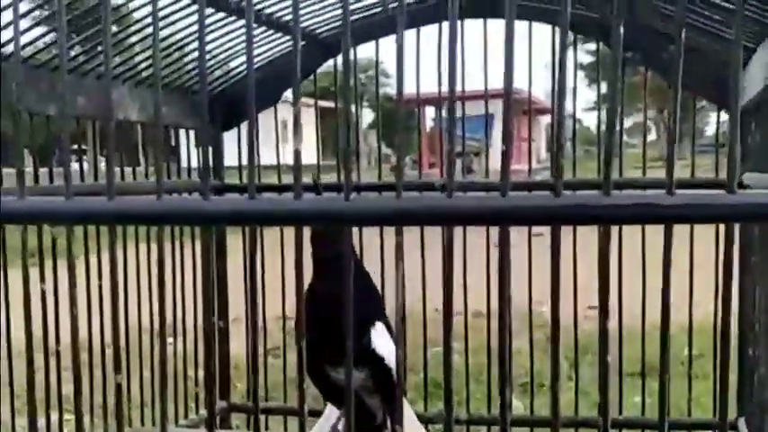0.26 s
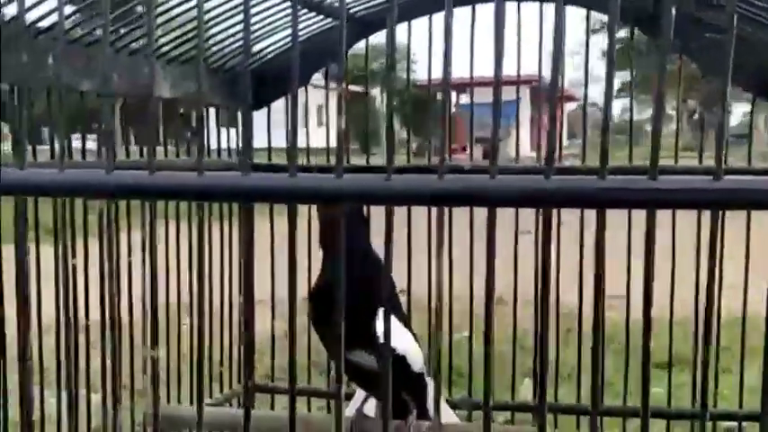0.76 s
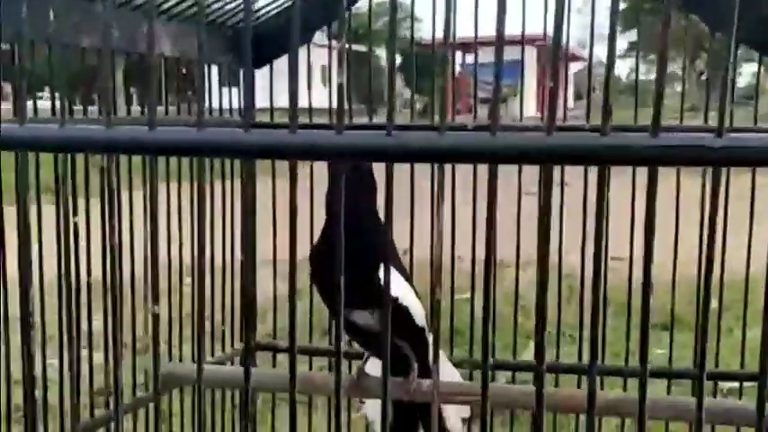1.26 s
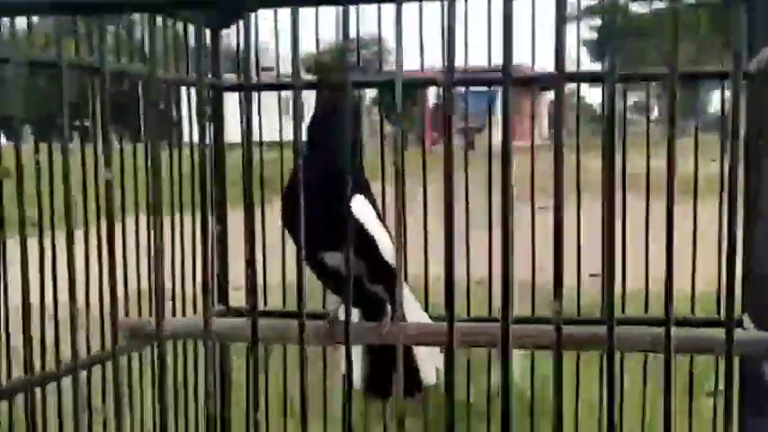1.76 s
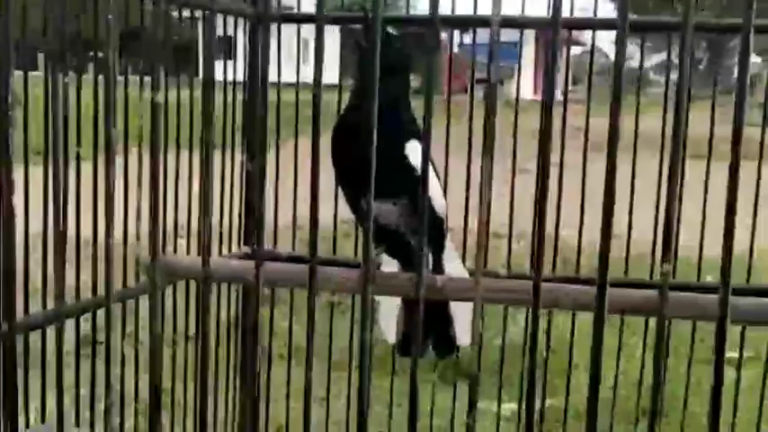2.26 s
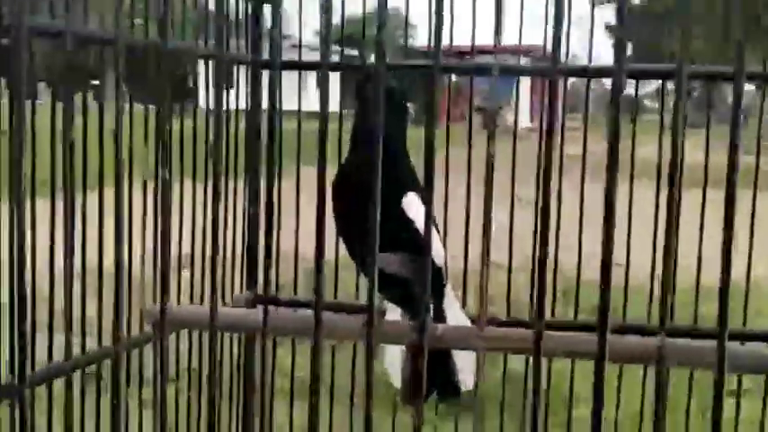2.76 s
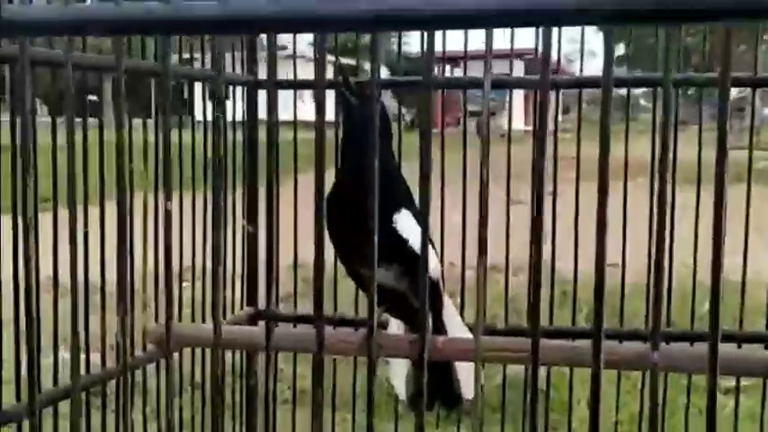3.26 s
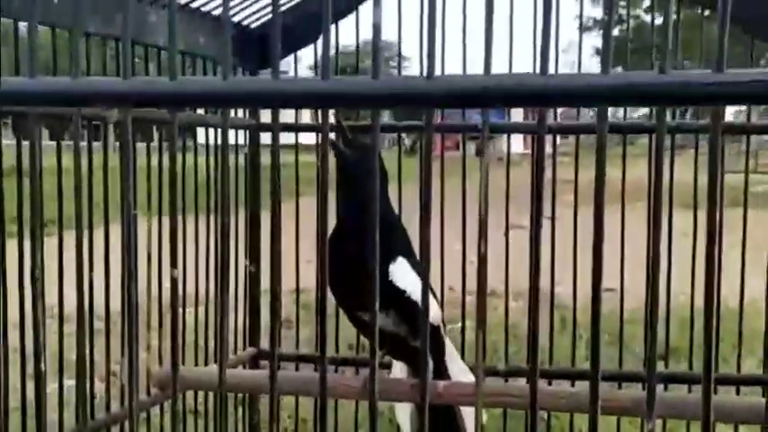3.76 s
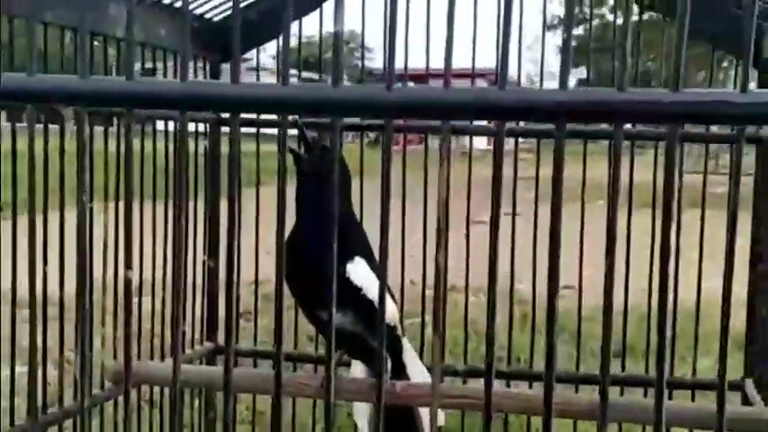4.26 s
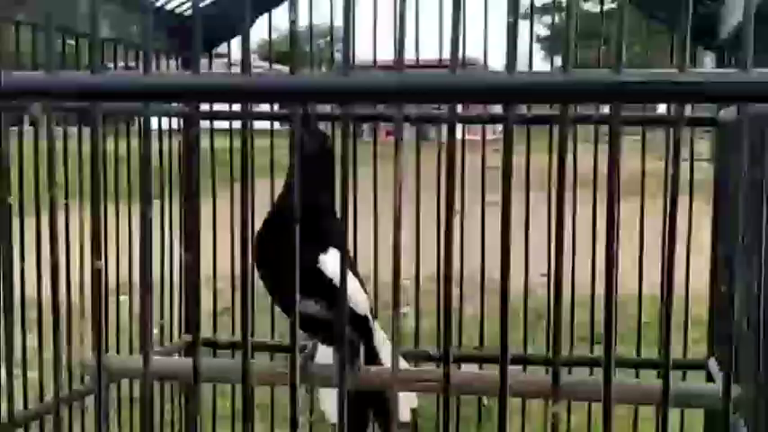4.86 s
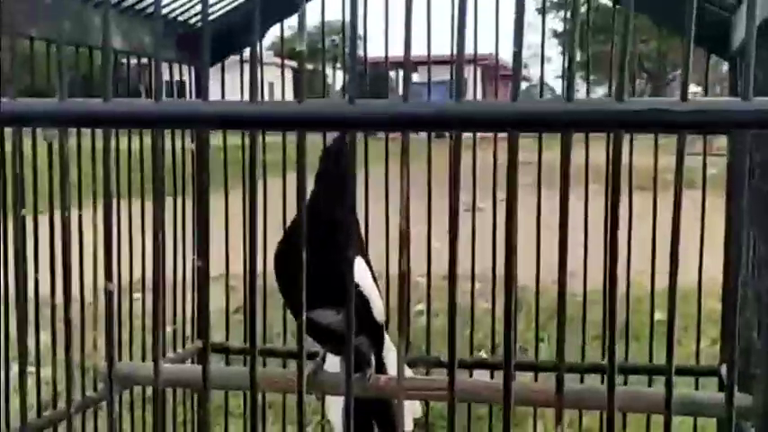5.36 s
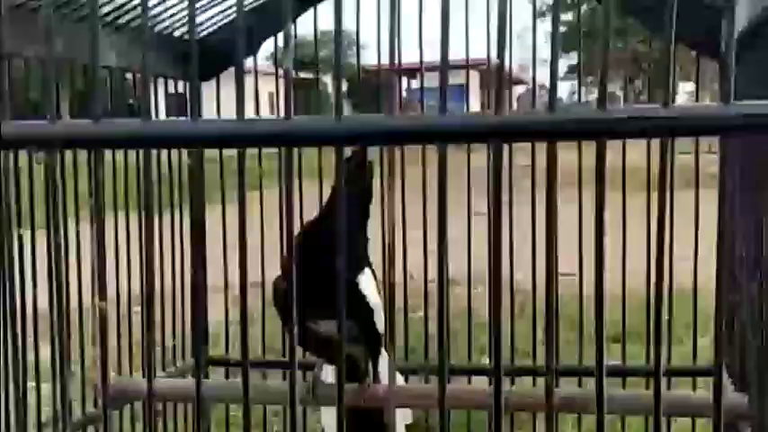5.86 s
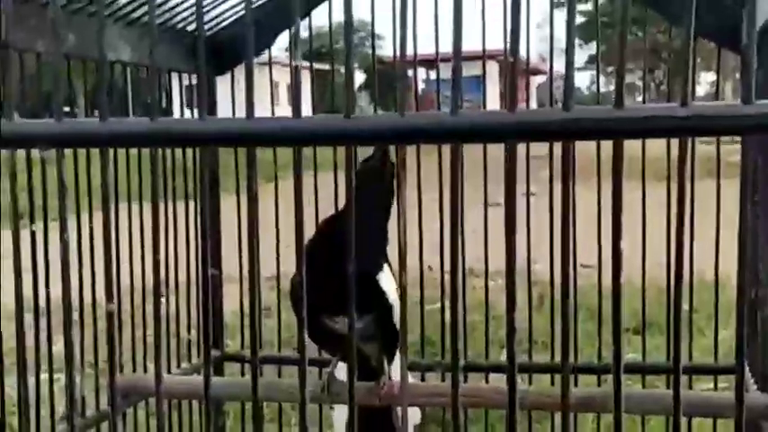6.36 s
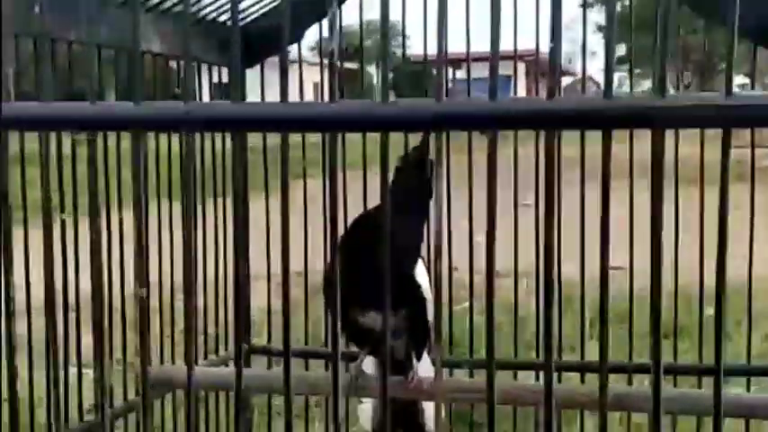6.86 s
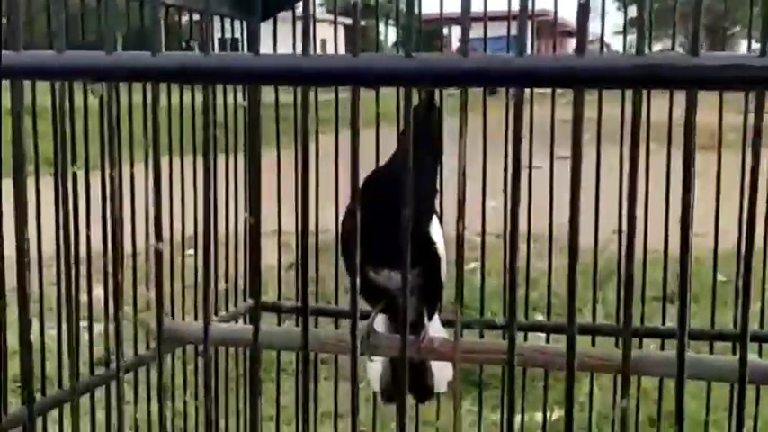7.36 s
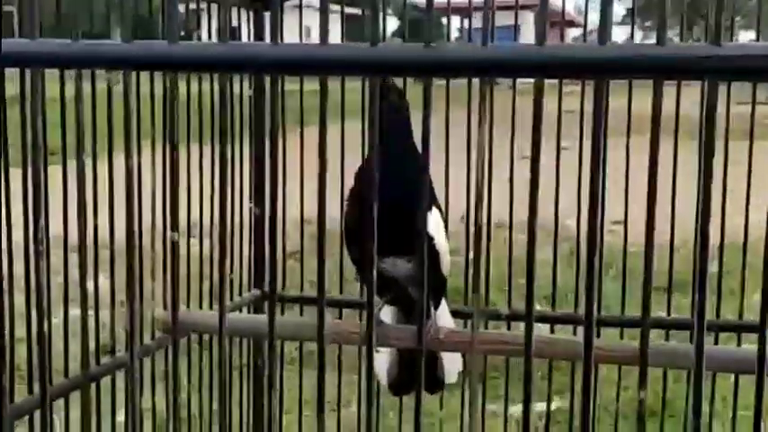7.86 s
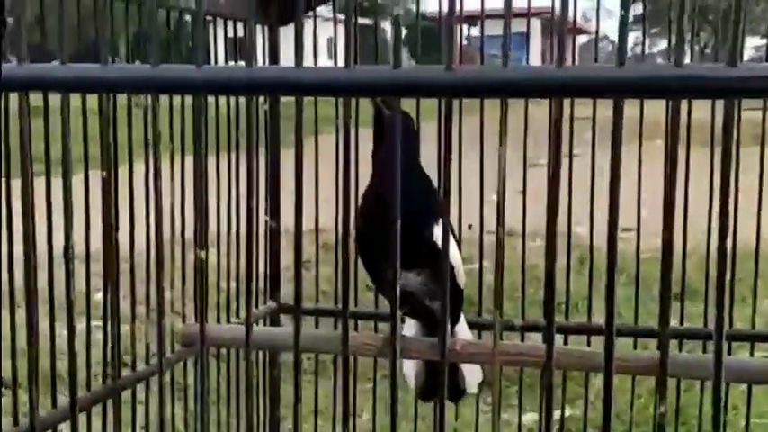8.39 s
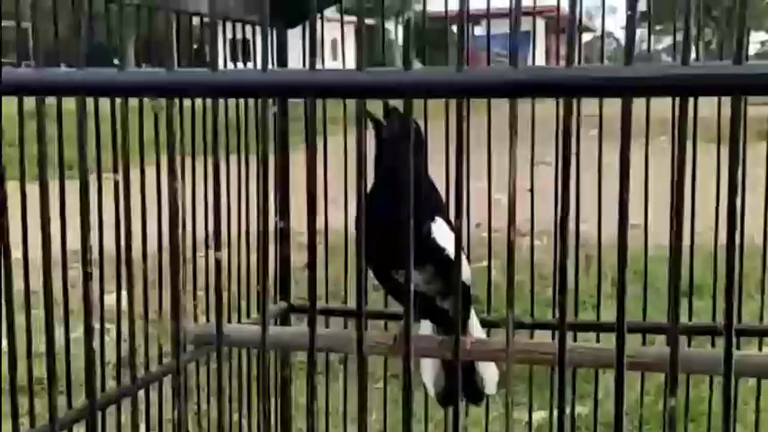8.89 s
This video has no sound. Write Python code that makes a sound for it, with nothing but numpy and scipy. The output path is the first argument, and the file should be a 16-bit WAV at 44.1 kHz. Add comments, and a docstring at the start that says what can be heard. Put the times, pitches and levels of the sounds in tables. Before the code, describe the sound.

A caged songbird sings close to the microphone outdoors. It opens with slurred whistles and a quick run of chirps, then a long arching whistle and a dry rattle. Harsh, nasal and buzzy notes follow, then a run of rasps, before the arching phrase returns. A few sharp clicks fall between notes, while faint far birds and a low rumble lie beneath.

```python
"""A caged songbird outdoors

Close by, a bird's syrinx, filtered by its throat, gives whistles, warbled trills, harsh notes,
a rattle and rasps; sharp clicks fall between the notes. Far birds and a low background rumble
lie beneath, and reflections from walls and ground add a thin tail.
A limiter lowers the gain after the loudest peaks."""
import sys
import numpy as np
from scipy import signal
from scipy.fft import rfft, irfft
from scipy.io import wavfile
from scipy.ndimage import uniform_filter1d, minimum_filter1d

SR = 44100
rng = np.random.default_rng(int(sys.argv[2]) if len(sys.argv) > 2 else 0)


def digitize_waveform(pressure):
    """Quantize a signal to 16-bit integers and store it at the path in sys.argv[1].

    Rows of a 2-D input are taken as channels; values are limited to [-1, 1].
    """
    field = np.atleast_2d(pressure).T
    bounded = np.clip(field, -1, 1)
    quanta = np.round(bounded * 32767).astype(np.int16)
    wavfile.write(sys.argv[1], SR, quanta)


N = 402629

# Level of the low background rumble, including its ducking under the long whistles: time_s, level_db
RUMBLE_LEVEL = [(0, -38.5), (1.5, -38), (2.6, -34), (4.0, -36), (4.8, -37), (5.1, -28), (6.6, -33.5),
                (7.6, -32), (9.13, -29)]
# Spectra of the rumble and the far twitter: frequency_hz, relative_db
RUMBLE_SPECTRUM = [(20, -48), (30, -11.5), (81, 2), (148, -0.5), (250, -10.5), (389, -18.5), (575, -41.5),
                   (1400, -51.5), (2500, -77)]
TWITTER_SPECTRUM = [(1300, -33.5), (1800, -3.5), (3200, -22.5), (4200, -12), (5600, -18.5)]
# Far whistles and coos: start_s, end_s, first_hz, last_hz, level_db
FAR_CALLS = [(.735, 0.78, 5200, 5400, -53), (.85, 0.898, 4850, 5200, -49), (.96, 1.006, 4880, 5100, -48),
             (1.07, 1.136, 4300, 5030, -55.5), (3.04, 3.17, 5050, 5070, -64.5),
             (4.8, 5.122, 1750, 1884, -51), (5.569, 5.775, 782, 740, -50), (6.101, 6.515, 750, 870, -54),
             (6.97, 7.15, 1830, 1963, -51), (7.197, 7.43, 750, 815, -54), (7.85, 8.152, 768, 906, -46)]
# Weighting of the harmonics, throat resonance plus the microphone's treble lift: frequency_hz, gain_db
HARMONIC_WEIGHTS = [(1200, 24.5), (2000, 7), (3500, 12.5), (4300, -1), (5300, -3), (6300, -32.5),
                    (9000, -28), (13000, -27), (16000, -23.5)]
# Contours of repeated syllables, by kind: offset_s, pitch_hz, level_db
SYLLABLES = { "slur": [(0, 3150, -40), (.012, 3222, -18.5), (.03, 3198, -9.5), (.065, 3027, -14),
             (.13, 2834, -16.5), (.147, 2800, -32)], "chip": [(0, 3250, -33), (.005, 3165, -11.5),
             (.014, 3073, -12), (.033, 2891, -15.5), (.047, 3020, -14.5), (.056, 2964, -31.5)],
             "hook": [(0, 1644, -33.5), (.014, 1681, -20), (.033, 1959, -21.5), (.042, 2082, -13.5),
             (.056, 2155, -11), (.064, 2080, -17.5), (.072, 1976, -40.5)], "lead": [(0, 1655, -39),
             (.01, 1680, -22), (.03, 2080, -21.5), (.052, 2220, -16)], "arch": [(0, 2197, -23.5),
             (.022, 2920, -12.5), (.035, 3150, -8.5), (.07, 3390, -13.5), (.16, 3555, -13.5),
             (.255, 3604, -15), (.28, 3350, -17), (.292, 2970, -18), (.33, 2200, -16), (.35, 2020, -16.5),
             (.378, 1763, -32.5)], "rise": [(0, 2030, -55.5), (.012, 2060, -26.5), (.03, 2287, -21),
             (.042, 2487, -10), (.057, 2560, -13), (.064, 2533, -29.5)], "pipe": [(0, 2710, -13.5),
             (.008, 3278, -19.5), (.027, 3074, -8.5), (.083, 2990, -15.5), (.1, 2990, -38)],
             "peak": [(0, 2280, -39.5), (.009, 2900, -25.5), (.014, 3350, -14.5), (.019, 3450, -9),
             (.035, 3250, -14.5), (.059, 3046, -30)], "flick": [(0, 2680, -37), (.026, 2165, -31),
             (.05, 2770, -18), (.069, 2605, -18.5), (.084, 2670, -53)], "chatter": [(0, 1326, -31.5),
             (.006, 1900, -14.5), (.01, 2001, -9.5), (.015, 1915, -14.5), (.022, 1400, -19),
             (.034, 1140, -24.5)], }
# Each use of a syllable, by kind: start_s, time_factor, pitch_factor, gain_db
REPEATS = { "slur": [(.2, 1.056, 0.9955, -0.2), (.41, .93, 1.03, 0.7)], "chip": [(.613, 0.71, 1.005, 0.7),
           (.695, 0.86, 1, -0.5), (.786, 0.97, .99, -1.4), (.9, 1.02, 1.003, -1.2),
           (1.008, .93, 1.005, -1.5), (1.124, 1.12, 1.004, -2)], "hook": [(1.874, 1.2, .99, 0.5),
           (2.01, 0.97, 1.008, 0), (7.806, 1.26, 0.997, 2.8), (7.945, .97, 0.98, 0)],
           "lead": [(2.123, .99, .995, -3), (8.059, 1.02, 0.99, 1)], "arch": [(2.17, 0.992, 1.0115, 0.14),
           (8.108, 1.022, 1, 0.9)], "rise": [(2.806, 1.001, 1.003, 1), (8.645, 0.96, 1.012, 2.5)],
           "pipe": [(2.848, 1.05, .993, 0), (8.69, 0.92, 1.011, 3)], "peak": [(3.3, 0.97, 0.998, -0.7),
           (9.021, 1.05, 1.004, 3.7)], "flick": [(3.336, 1.005, 1.035, -1.8), (9.06, 0.89, 1.015, 0)],
           "chatter": [(5.114, 0.9, 1.02, -0.5), (5.144, 1.32, 1.05, -0.76), (5.173, 1.15, .96, -1)], }
# Contours of notes sung once, by kind: time_s, pitch_hz, level_db
SINGLE_NOTES = { "fall": [[(0.0, 2720, -54.5), (.012, 2690, -28), (0.047, 2534, -21.5),
                (0.072, 2410, -11.5), (.095, 2200, -27), (0.11, 2050, -12.5), (.128, 1927, -22.5),
                (.14, 1820, -17.5), (0.152, 1840, -32)]], "clear": [[(1.217, 3480, -29), (1.225, 3096, -11),
                (1.25, 3034, -12.5), (1.278, 3006, -40), (1.298, 3126, -13), (1.308, 3044, -11.5),
                (1.359, 3048, -16.5), (1.389, 3034, -38.5)], [(3.982, 2999, -65), (4.019, 3323, -19),
                (4.056, 3400, -14), (4.122, 3253, -15.5), (4.152, 3144, -18), (4.178, 2990, -58.5)],
                [(4.418, 3020, -33.5), (4.442, 3080, -12.5), (4.522, 2860, -19.5), (4.542, 2930, -29.5)],
                [(4.622, 2750, -38), (4.659, 2765, -18.5), (4.696, 2755, -13.5), (4.704, 2680, -44)],
                [(4.692, 3030, -15), (4.698, 3190, -4.5), (4.73, 3171, -11.5), (4.832, 3335, -13),
                (4.892, 3393, -13), (4.91, 3310, -44.5)]], "drone": [[(3.96, 1740, -28.5),
                (4.026, 1918, -27), (4.068, 1874, -29.5), (4.074, 1860, -51)], [(4.315, 1705, -31.5),
                (4.344, 1786, -22), (4.426, 1769, -17.5), (4.434, 1720, -20.5), (4.439, 1750, -27)],
                [(5.79, 1886, -36), (5.803, 1806, -22), (5.852, 1695, -19.5), (5.886, 1771, -17.5),
                (5.91, 1610, -31)]], "breathy": [[(5.002, 3050, -35), (5.008, 3470, -18.5),
                (5.022, 3740, -17.5), (5.036, 4020, -8), (5.046, 4220, -11), (5.051, 3930, -16),
                (5.062, 3140, -29.5)], [(5.775, 3540, -41), (5.807, 3870, -8), (5.812, 3920, -8),
                (5.826, 4020, -43)], [(6.508, 5010, -30.5), (6.517, 4140, -9.5), (6.523, 3030, -21),
                (6.534, 1800, -24.5), (6.545, 1630, -31.5), (6.558, 2160, -24), (6.564, 2410, -12.5),
                (6.578, 2483, -15.5), (6.596, 2230, -25.5)], [(6.63, 1744, -55.5), (6.644, 2920, -23.5),
                (6.66, 3090, -10), (6.675, 3210, -12.5), (6.684, 3240, -51)], [(6.668, 4000, -30),
                (6.676, 3985, -19), (6.7, 3740, -12), (6.717, 3530, -25), (6.728, 3350, -15),
                (6.74, 3180, -39)]], "harsh": [[(5.362, 1680, -35), (5.386, 1714, -11), (5.43, 1576, -8),
                (5.439, 1541, -12.5), (5.482, 1137, -31.5)]], "nasal": [[(6.058, 1636, -57.5),
                (6.08, 1711, -14.5), (6.112, 1679, -7), (6.163, 1704, -10), (6.189, 1624, -10),
                (6.216, 1340, -54)]], "buzz": [[(5.82, 4130, -10.5), (5.87, 4205, -17.5),
                (5.891, 3955, -18.5), (5.908, 3607, -39.5)]], }
# Base timbre, by kind: overtone_gain_db, breath_db
TIMBRES = {"slur": (-12, -49), "chip": (-7.5, -33.5), "hook": (-19, -35.5), "lead": (-6.5, -30),
           "arch": (-6.5, -48), "rise": (-18, -32), "pipe": (-10, -40), "peak": (-10, -27),
           "flick": (-5.5, -39), "chatter": (11, -22), "clear": (-11.5, -46), "drone": (-1.2, -38),
           "breathy": (-19, -30), "harsh": (14, -30), "nasal": (14.7, -36.5), "fall": (-19.5, -45.5),
           "buzz": (-8, -10)}
# Modulation, by kind: rate_hz, first_depth, last_depth, pitch_share_per_depth
WARBLES = {"slur": (67.2, 0.44, 0.056, .08), "chip": (108, 0.76, -0.18, .07),
           "harsh": (218, .04, 0.36, .02), "nasal": (228, 0.16, 0.085, 0.035),
           "buzz": (83, 0.062, 0.14, .54)}
# Hard taps and scratchy ticks: start_s, relative_db
CLICKS = [(2.3485, -35.5), (2.7881, -6), (8.2197, -6.5), (8.5935, -3)]
TICKS = [(5.024, -18.5), (5.2888, -15.5), (5.5643, -22), (5.7124, -24), (5.9955, -22), (7.3875, -25)]
# Modes rung by a tap: frequency_hz, relative_db, t60_s
CLICK_MODES = [(2343, 3, 0.016), (2490, -13.5, 0.015), (4860, -29, 0.019)]
# Rattle beats, evenly spaced between rows: time_s, beat_number
RATTLE_BEATS = [(3.42, 0), (3.508, 3), (3.575, 5), (4.344, 29), (4.372, 30), (4.548, 37)]
# Strength of the rattle: time_s, chirp_gain_db, pop_gain_db
RATTLE_SWELL = [(3.42, -31, -48), (3.49, -24, -16), (3.56, -34, -26.5), (3.9, -35.5, -33),
                (4.06, -34.5, -32.5), (4.13, -50, -45.5), (4.23, -35.5, -27.5), (4.42, -37.5, -33.5),
                (4.56, -42, -41)]
# Hiss of the rattle and the ticks: frequency_hz, relative_db
HISS_SPECTRUM = [(900, -39.5), (1200, -32.5), (1800, -6), (3100, -8), (5000, -23), (9900, -25.5),
                 (15500, -35)]
# Rasped bursts: peak_s, gain_db
RASP_BURSTS = [(5.128, -31), (5.186, -26.5), (7.329, -36), (7.442, -26.5), (7.553, -25.5), (7.677, -27),
               (7.796, -28.5), (7.916, -27.5), (8.037, -33)]
# Throat modes in a rasp: frequency_hz, width_hz, relative_db
RASP_MODES = [(2030, 60, 8.5), (2935, 260, 15.5), (4134, 110, 14), (4530, 170, -21.5), (3650, 1200, 5.5),
              (10800, 2900, -3.5)]

OVERTONE_TILT_DB, OVERTONE_FLUTTER_DB = -1, 3   # per harmonic; spread above the second harmonic
JITTER, WAVER = 0.0036, 0.035   # rms unsteadiness of pitch and of amplitude, as shares
SLIDE_OVERTONE_DB, SLIDE_BREATH_DB = 1.5, 2   # per unit of log pitch a second
WARBLE_BREATH_DB, COUPLING = 22, 0.23   # added breath at full depth; mixing of overlapping notes
HIGH_HISS_HZ, HIGH_HISS_WIDTH_HZ, HIGH_HISS_DB = 13050, 2500, -30   # faint high hiss with each note
HIGH_HISS_FOLLOWS = .4   # share of the breath's dB added to that hiss
TAIL_DB, TAIL_T60_S, MICROPHONE_HISS_DB = -32.5, 0.69, -74
CEILING, RECOVER_DB_S, CUTOFF_HZ = .68, 8, 16000


def amp(db):
    """Decibels as an amplitude ratio."""
    return 10 ** (np.asarray(db) / 20)


def rms_one(x):
    """Normalisation to unit rms."""
    return x / np.sqrt(np.mean(x ** 2) + 1e-20)


def column(rows, index, t):
    """Linear interpolation of one column at the times t."""
    return np.interp(t, np.array(rows)[:, 0], np.array(rows)[:, index])


def at_hz(points, hz):
    """Interpolation of a spectrum in log frequency."""
    return np.interp(np.log(hz + 1e-9), np.log(np.array(points)[:, 0]), np.array(points)[:, 1])


def filtered(x, order, hz, kind="low"):
    """A maximally flat low-pass or high-pass filter."""
    return signal.sosfilt(signal.butter(order, hz, kind, fs=SR, output="sos"), x)


def coloured(spectrum):
    """Spectral shaping of white noise, at unit rms."""
    hz = np.fft.rfftfreq(N, 1 / SR)
    return rms_one(irfft(rfft(rng.standard_normal(N)) * amp(at_hz(spectrum, hz)), N))


def drift(rate_hz):
    """Random fluctuation: low-passed noise at unit rms."""
    return rms_one(filtered(rng.standard_normal(N + SR), 2, rate_hz)[SR:])


def resonance(x, hz, width_hz):
    """A damped two-pole resonator with unit peak gain."""
    r = np.exp(-np.pi * width_hz / SR)
    feedback = [1, -2 * r * np.cos(2 * np.pi * hz / SR), r * r]
    return signal.lfilter([(1 - r * r) / 2, 0, (r * r - 1) / 2], feedback, x)


def rumble():
    """Amplitude modulation: low background noise follows a level curve and fluctuates at random."""
    t = np.arange(N) / SR
    return amp(column(RUMBLE_LEVEL, 1, t) + 1.4 * drift(5.1)) * coloured(RUMBLE_SPECTRUM)


def far_birds():
    """Random modulation: noise bands fade independently as a twitter, and gliding tones waver as calls."""
    twitter, wobble, blur = coloured(TWITTER_SPECTRUM), drift(28), drift(70)
    out = sum(amp(-57 + 6 * drift(4)) * resonance(twitter, hz, .04 * hz)
              for hz in np.geomspace(1700, 5000, 7))
    for start, end, first_hz, last_hz, db in FAR_CALLS:
        i = np.arange(round(start * SR), round(end * SR))
        hz = np.linspace(first_hz, last_hz, len(i)) * (1 + 0.021 * wobble[i])
        envelope = amp(db) * blur[i] * np.sqrt(np.hanning(len(i)))
        out[i] += envelope * np.sin(2 * np.pi * np.cumsum(hz) / SR)
    return out


def notes():
    """Scaled and shifted syllables, then single notes, as kind and rows of time_s, pitch_hz, level_db."""
    repeated = [(kind, np.array(SYLLABLES[kind]) * [stretch, factor, 1] + [start, 0, db])
                for kind, rows in REPEATS.items() for start, stretch, factor, db in rows]
    return repeated + [(kind, np.array(note)) for kind, sung in SINGLE_NOTES.items() for note in sung]


def syrinx_tone(hz, overtone_db, flutter, i):
    """Source and filter: seven harmonics, weighted by frequency, at constant power over the samples i."""
    order = np.arange(1, 8)[:, None]
    phase = 2 * np.pi * np.cumsum(hz) / SR
    source_db = (order > 1) * (overtone_db + OVERTONE_TILT_DB * (order - 4.5))
    flutter_db = OVERTONE_FLUTTER_DB * flutter[i - 5000 * order] * (order > 2)   # each at its own lag
    gains = amp(at_hz(HARMONIC_WEIGHTS, order * hz) + source_db + flutter_db) * (order * hz < .4 * SR)
    return np.sum(gains * np.sin(order * phase), axis=0) / np.sqrt(np.sum(gains ** 2, axis=0) / 2)


def song():
    """Amplitude and frequency modulation warble the syrinx tone; breath adds noise sidebands."""
    out, breath, waver, flutter = np.zeros(N), drift(490), drift(51), drift(100)
    hiss_gain = amp(HIGH_HISS_DB + 2.7 * drift(30))
    high_band = resonance(rng.standard_normal(N), HIGH_HISS_HZ, HIGH_HISS_WIDTH_HZ)
    high_hiss = hiss_gain * rms_one(resonance(high_band, HIGH_HISS_HZ, HIGH_HISS_WIDTH_HZ))
    for kind, note in notes():
        i = np.arange(max(round(note[0, 0] * SR), 0), min(round(note[-1, 0] * SR), N))
        t = i / SR
        overtone_db, breath_db = TIMBRES[kind]
        warble_hz, first_depth, last_depth, bend = WARBLES.get(kind, (0, 0, 0, 0))
        depth = np.clip(np.linspace(first_depth, last_depth, len(i)), 0, 1)
        warble_phase = 2 * np.pi * warble_hz * (t - t[0])
        glide_hz = uniform_filter1d(column(note, 1, t), size=130)
        slide = SR * np.gradient(np.log(glide_hz))
        # a falling slide slackens the membranes and brightens the tone
        overtone_db += SLIDE_OVERTONE_DB * uniform_filter1d(np.clip(-slide, 0, 8.5), size=400)
        slide_speed = uniform_filter1d(np.clip(np.abs(slide), 0, 12), size=400)
        breath_db += WARBLE_BREATH_DB * depth + SLIDE_BREATH_DB * slide_speed
        hz = glide_hz * (1 + bend * depth * np.sin(warble_phase) + JITTER * flutter[i])
        tone = syrinx_tone(hz, overtone_db, flutter, i)
        modulation = 1 - depth * np.cos(warble_phase) + amp(breath_db) * breath[i] + WAVER * waver[i]
        voice = tone * modulation + amp(HIGH_HISS_FOLLOWS * breath_db) * high_hiss[i]
        level = np.interp(t, note[:, 0], amp(note[:, 2]))
        fade = np.clip(np.minimum(t - t[0], t[-1] - t) / .002, 0, 1)
        # both sides of the syrinx sounding together give sum and difference tones
        out[i] += voice * level * fade * (1 + COUPLING * out[i])
    return filtered(out, 4, 1000, "high")


def reflections(x):
    """Reverberation from walls and ground: convolution with dull, exponentially decaying noise."""
    t = np.arange(SR) / SR
    echoes = rng.standard_normal(SR) * amp(-60 * t / TAIL_T60_S) * (t > .004)
    echoes = filtered(echoes, 2, 4500)
    return amp(TAIL_DB) * signal.fftconvolve(x, echoes / np.sqrt(np.sum(echoes ** 2)))[:N]


def clicks():
    """Impact excitation: each tap cracks and rings damped modes. Ticks are brief bursts of hiss."""
    t = np.arange(900) / SR
    ring = sum(amp(db) * np.sin(2 * np.pi * hz * t) * amp(-60 * t / t60) for hz, db, t60 in CLICK_MODES)
    taps, tick_envelope = np.zeros(N), np.zeros(N)
    for start, db in CLICKS:
        i = round(start * SR)
        crack = rng.standard_normal(len(t)) * np.exp(-t / 0.0012)
        taps[i:i + len(t)] += amp(db + 9) * (ring + 0.071 * crack)
    for start, db in TICKS:
        i = round(start * SR)
        tick_envelope[i:i + len(t)] = amp(db - 10) * np.exp(-(t / 0.0086) ** 3)
    return taps + tick_envelope * coloured(HISS_SPECTRUM)


def rattle():
    """A pulse train: each beat is a damped low pop, then three rising chirps in a puff of hiss."""
    out, puffs, t = np.zeros(N), np.zeros(N), np.arange(1500) / SR
    hoarseness = drift(240)
    times, numbers = np.transpose(RATTLE_BEATS)
    beats = np.interp(np.arange(numbers[-1] + 1), numbers, times)
    for start, chance in zip(beats, rng.standard_normal((len(beats), 3, 3))):
        start += .0015 * chance[1, 2]
        span = slice(round(start * SR), round(start * SR) + len(t))
        pop_hz = 460 * (1 + 0.06 * chance[0, 0])
        pop = np.sin(2 * np.pi * pop_hz * t) * (t / 0.0004) * np.exp(-t / 0.0013)
        out[span] += amp(column(RATTLE_SWELL, 2, start)) * filtered(pop, 4, 800)
        puffs[span] += .25 + np.sin(np.pi * np.clip((t - .004) / .028, 0, 1))
        for delay_s, base_hz, (detune, accent, lag) in zip((.008, .015, .022), (1500, 2300, 1700), chance):
            progress = np.clip((t - delay_s - 0.0012 * lag) / 0.0054, 0, 1)
            hz = base_hz * (1 + .12 * detune) + 1400 * progress
            chirp = np.sin(2 * np.pi * np.cumsum(hz) / SR) * (1 + hoarseness[span])
            gain = amp(column(RATTLE_SWELL, 1, start) + 0.64 * accent)
            out[span] += gain * chirp * np.sin(np.pi * progress)
    swell = amp(column(RATTLE_SWELL, 1, np.arange(N) / SR) - 6)
    return out + swell * puffs * coloured(HISS_SPECTRUM)


def rasps():
    """Forced resonance: irregular syrinx pulses and air noise drive the throat modes in bursts."""
    t, envelope = np.arange(N) / SR, np.zeros(N)
    for peak_s, db in RASP_BURSTS:
        u = (t - peak_s) / np.where(t < peak_s, .03, .037)
        envelope += amp(db) * (np.exp(-2.5 * u ** 2) + 0.53 * np.exp(-.12 * u ** 4))   # peak and shoulder
    pulses = (rng.random(N) < 600 / SR) * rng.standard_normal(N)   # about 600 a second
    drive = rms_one(pulses) + rng.standard_normal(N)
    throat = sum(amp(db) * rms_one(resonance(drive, hz, width)) for hz, width, db in RASP_MODES)
    undertone = amp(-24.5) * rms_one(resonance(drive, hz=560, width_hz=100))
    return envelope * (rms_one(filtered(throat, 4, 1300, "high")) + undertone)


def scene():
    """Superposition of the near sounds, their reflections and the background, in one channel."""
    near = song() + rattle() + rasps() + clicks()
    outdoors = near + reflections(near) + far_birds() + rumble()
    return (outdoors + amp(MICROPHONE_HISS_DB) * rng.standard_normal(N))[None]


def record(dry):
    """Peak limiting: gain drops 2 ms ahead of a peak and recovers slowly; a low-pass cuts the top."""
    recovery_db = RECOVER_DB_S * np.arange(N) / SR
    excess_db = -minimum_filter1d(-20 * np.log10(np.abs(dry) / CEILING + 1e-9), size=180)
    duck_db = np.maximum(np.maximum.accumulate(excess_db + recovery_db, axis=1) - recovery_db, 0)
    limited = dry * amp(-uniform_filter1d(duck_db, size=90))
    return signal.sosfilt(signal.cheby2(12, 60, CUTOFF_HZ, fs=SR, output="sos"), limited)


dry = scene()
out = record(dry)
digitize_waveform(out)
```